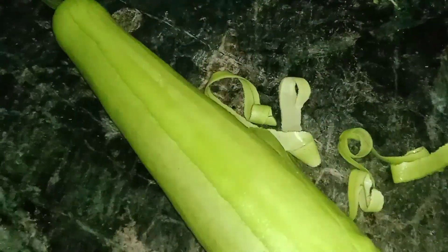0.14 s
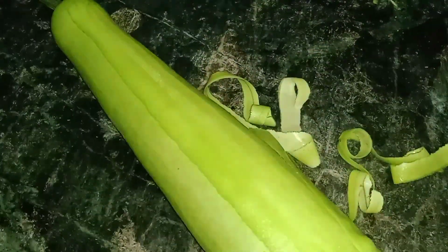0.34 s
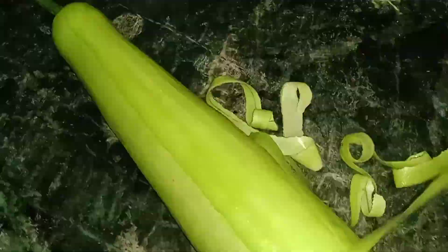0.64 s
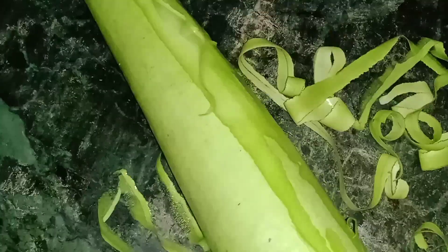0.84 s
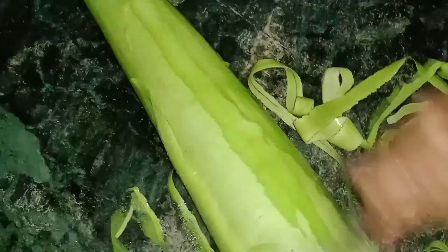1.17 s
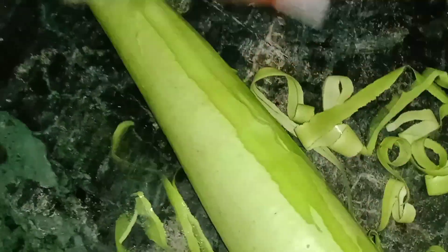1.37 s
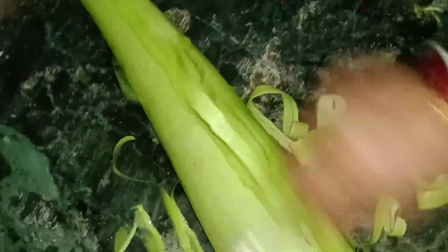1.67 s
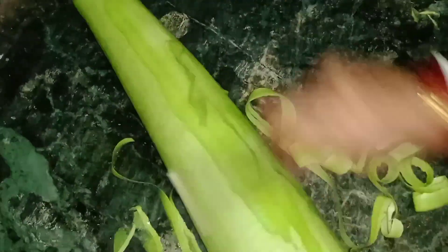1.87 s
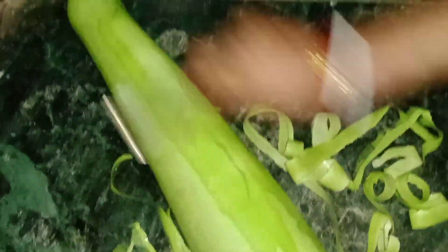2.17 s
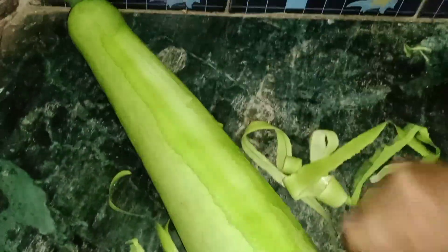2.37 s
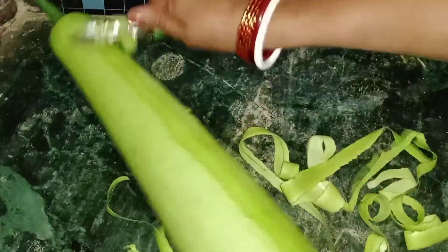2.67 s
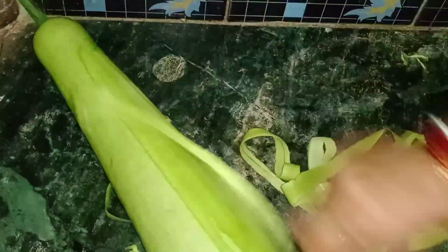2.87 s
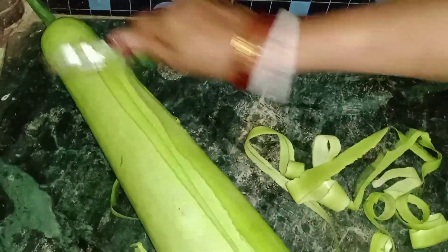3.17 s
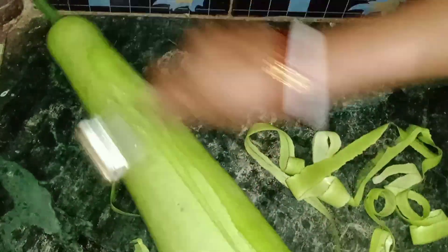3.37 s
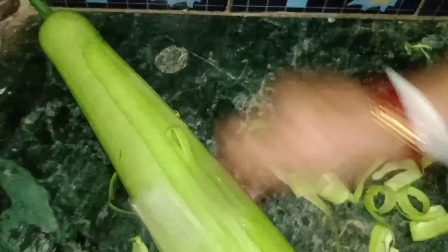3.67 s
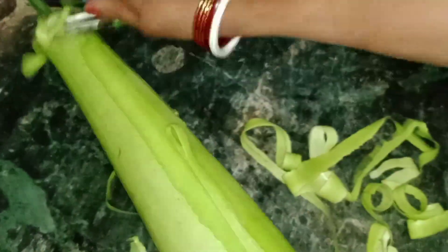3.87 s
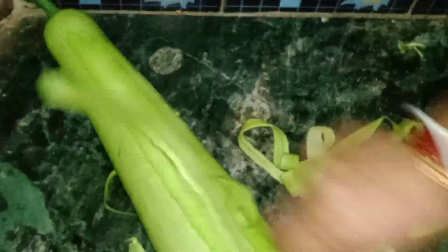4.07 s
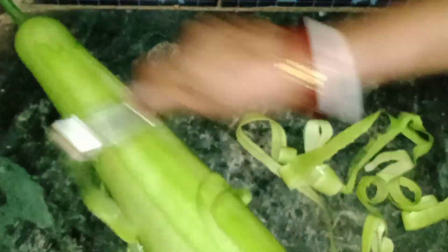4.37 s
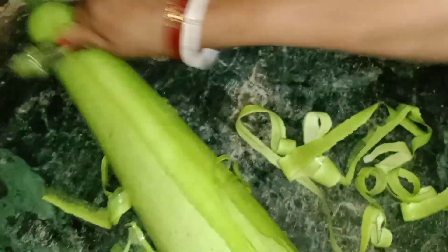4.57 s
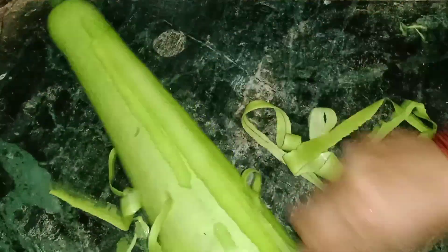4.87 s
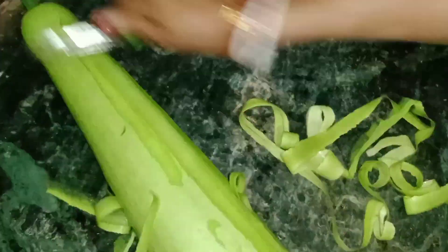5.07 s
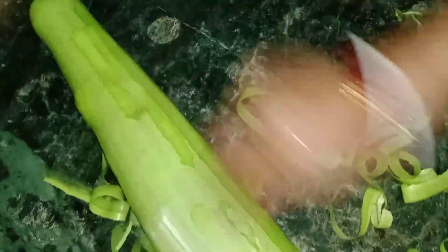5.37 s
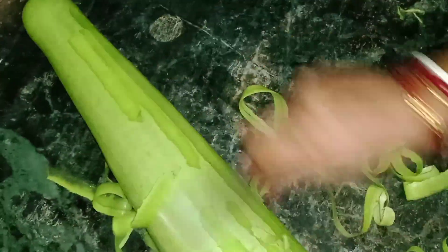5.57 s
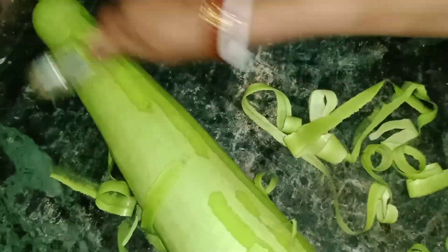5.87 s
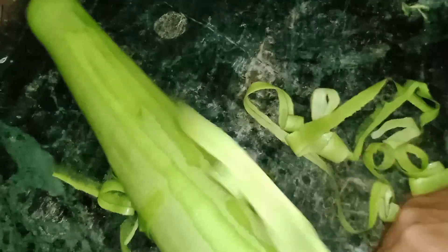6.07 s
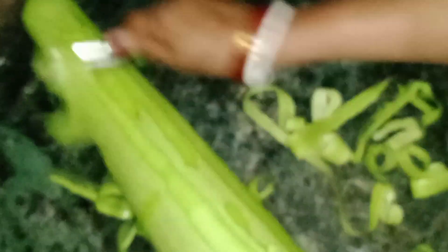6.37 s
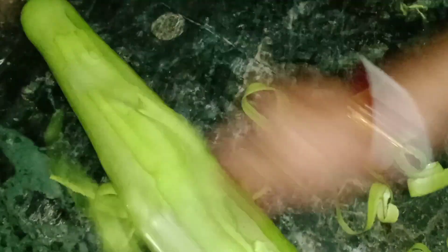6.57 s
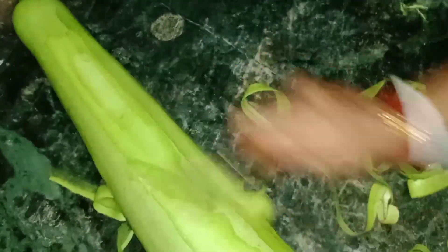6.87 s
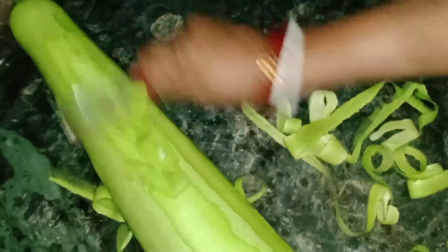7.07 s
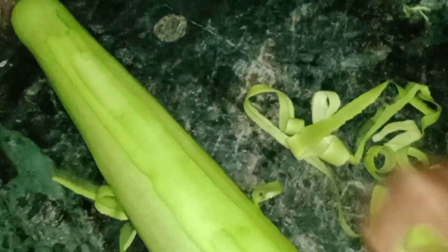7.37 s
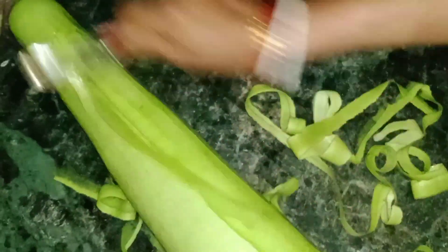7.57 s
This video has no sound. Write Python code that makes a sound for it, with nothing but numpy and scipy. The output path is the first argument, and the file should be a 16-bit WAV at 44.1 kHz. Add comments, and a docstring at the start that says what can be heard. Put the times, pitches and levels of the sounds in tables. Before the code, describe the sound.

Crisp, evenly paced peeling strokes zip along firm vegetable skin, with rattly blade clicks, tiny squeaks and soft knocks, close and dry indoors.

```python
"""A soft hiss dies away over quiet room noise, the gourd bumps on a stone counter and the sound drops out briefly.
Then a swivel peeler takes eleven quick strokes of skin off the bottle gourd.
Around the strokes its loose steel blade clicks and lands: filtered noise that dies away, as steel or firm flesh.
In each stroke random impulses, the bursting plant cells, ring the blade, tear the skin and thud in the flesh.
Squeaks, light brushes and a faint hum come and go; a small kitchen answers, the same in both channels."""
import sys
import numpy as np
from scipy import signal
from scipy.fft import rfft, irfft, next_fast_len
from scipy.io import wavfile
from scipy.ndimage import uniform_filter1d, map_coordinates

SR = 44100
rng = np.random.default_rng(int(sys.argv[2]) if len(sys.argv) > 2 else 0)


def wav_out(sig):
    """Save sig, one row per channel (or a flat mono array), as 16-bit PCM at SR to the path in sys.argv[1]."""
    wavfile.write(sys.argv[1], SR, np.round(np.clip(np.atleast_2d(sig).T, -1, 1) * 32767).astype(np.int16))


N = 340893
TIME = np.arange(N) / SR  # seconds

# Levels of layers and events are starting levels: the mix below adds its own gains.
# Peeling strokes: t/s, time to dig in/s, time at full depth/s, swell while digging in/dB, blade ring/dB,
#   tearing skin/dB, guard rasp/dB, flesh/dB, lower blade resonances/dB, chirping/dB
STROKES = [ (0.96, .12, .08, 14, -37, -50.5, -55.5, -64.5, 0, -6),
           (1.605, 0.15, .03, 11.5, -38.5, -47.5, -54, -63.5, 1.5, -5),
           (2.2, 0.051, 0.12, 6.5, -41.5, -48.5, -60.5, -67.5, -0.5, -4.5),
           (2.8, 0.12, 0.062, 4.5, -47.5, -49.5, -60, -63, 2.5, -8.5),
           (3.393, 0.14, .036, 10, -39, -46, -56.5, -62.5, 0.5, -2.5),
           (4.005, 0.087, 0.081, 10, -33.5, -45, -54, -63.5, 0.5, -17),
           (4.68, 0.12, 0.088, 6.5, -42, -49, -55, -62.5, 2, -5.5),
           (5.322, .165, .045, 3.5, -43, -50.5, -56.5, -61, -2, -19),
           (5.938, 0.17, .035, 14.5, -33, -42.5, -51, -58.5, 0.5, -11.5),
           (6.541, 0.16, 0.058, 1.5, -38.5, -43.5, -54.5, -64.5, 0, -8.5),
           (7.172, 0.1, .05, 13, -40.5, -45.5, -59.5, -62, 1.5, -20)]
# Light brushes of the blade on the way back: t/s, length/s, level/dB
BRUSHES = [(3.085, .04, -64.5), (3.127, .05, -58), (3.2, 0.064, -53.5), (4.39, 0.071, -61.5),
           (6.473, 0.02, -51), (6.925, 0.021, -53)]
# The edge snags on tougher skin and the blade rings harder: t/s, length/s, level/dB
SNAGS = [(1.714, 0.024, -38), (2.92, 0.017, -50), (4.848, 0.033, -45.5), (5.487, 0.033, -42.5)]
# The hand slides over the gourd: t/s, length/s, level/dB
HAND_SLIDES = [(0.757, 0.15, -57.5)]
# The gourd is turned and rubs on the stone: t/s, length/s, level/dB
TURNS = [(2.7, 0.586, -70)]
# The blade clicks in its swivel: t/s, level/dB, top octave/dB, time to fall 60 dB/s
CLICKS = [(0.8585, -35, -28, 0.011), (0.9045, -32.5, -5.5, .028), (1.2567, -48, -28, .015),
          (1.4688, -51, -3, .03), (1.494, -34, -6.5, .075), (2.0993, -44.5, -15, 0.023),
          (2.7228, -34, -7.5, 0.034), (3.315, -33.5, -6.5, 0.041), (3.898, -35.5, -4.5, 0.053),
          (4.4513, -44, -8.5, 0.029), (4.5473, -44, -9, 0.014), (4.5968, -41.5, -4, 0.096),
          (4.5987, -34, -1, 0.018), (4.604, -35, -13, 0.033), (5.0066, -45, -14, 0.033),
          (5.047, -20.5, -13, 0.0067), (5.1876, -34.5, -5.5, 0.041), (5.6328, -36, -10, 0.039),
          (5.7907, -52, -5, 0.029), (5.8661, -32.5, -2, 0.026), (5.877, -28.5, -8, 0.045),
          (6.4164, -56, -4, 0.044), (6.4527, -55, -5, .072), (6.471, -42.5, -15, .037),
          (6.9387, -45.5, -5, 0.021), (6.9453, -43, -1.5, 0.016), (7.0293, -52.5, -6, 0.054),
          (7.663, -57.5, -5, 0.02), (7.6744, -49, -2.5, 0.021)]
# The peeler lands on the gourd: t/s, level/dB
KNOCKS = [(0.56, -68), (0.912, -52.5), (1.552, -48.5), (1.862, -56.5), (2.145, -61), (2.734, -49.5),
          (3.316, -53.5), (3.937, -57.5), (4.614, -49), (5.325, -63), (5.947, -47)]
# The gourd bumps on the counter: t/s, level/dB
BUMPS = [(0.076, -61), (0.562, -55), (2.699, -63), (2.808, -61), (3.221, -66)]
# The blade catches and squeaks: t/s, length/s, f/Hz at the middle, level/dB
SQUEAKS = [(1.116, 0.0076, 6000, -33.5), (1.897, 0.013, 3070, -59.5), (3.11, 0.056, 3085, -63),
           (3.138, .053, 5900, -59), (3.218, .056, 3930, -57), (3.486, 0.006, 6070, -34.5),
           (4.063, 0.014, 6370, -32.5), (4.086, 0.025, 6160, -29.5), (6.559, .01, 5940, -37)]
# A faint hum swells and fades: t/s of the crest, level/dB, rise/(dB/s), fall/(dB/s)
HUM_SWELLS = [(3.34, -80, 300, 45), (3.66, -62.5, 54, 110), (4.12, -73.5, 37, 75)]

# Resonances, each table: f/Hz, width/Hz, level/dB
# The blade while it is pressed on the gourd, main and lower part
LOADED_BLADE = [(5580, 890, -10.5), (5760, 250, -3), (6220, 420, -2.5), (6670, 300, -9.5),
                (7120, 125, -8.5)]
LOADED_BLADE_LOW = [(3176, 105, -10.5), (3500, 520, -9), (3660, 110, -10.5), (3910, 115, 0)]
# The blade swinging free
FREE_BLADE = [(2300, 1600, -24), (3310, 380, -9), (5120, 620, -3), (6040, 580, 0.5), (6710, 235, 6),
              (7500, 240, -2)]
# The peeler's frame, rung by one harder contact
FRAME = [(2330, 81, 4), (2900, 140, 1)]
# The gourd under a knock
KNOCKED_GOURD = [(380, 160, 3.5), (714, 540, -14.5), (1030, 147, 9.5), (4170, 94, 10)]
# The gourd rocking on the stone
ROCKING_GOURD = [(109, 18, 0)]

# Broad spectra, each table: f/Hz, level/dB (per Hz)
# Tearing skin
TEARING_SKIN = [(900, -12), (1300, -12.5), (1750, 4.5), (2250, 8.5), (2600, 2), (3300, 10.5), (4800, 5),
                (7000, 13), (8300, 2), (9500, 5), (11400, 4), (13600, -4.5), (14800, 2.5), (15700, 9.5)]
# Rasp of the guard
GUARD_RASP = [(300, -29), (480, -22), (600, 2.5), (950, 2), (1250, 2), (1700, -8), (3000, -13.5)]
# Thud in the flesh
FLESH_THUD = [(50, -22), (70, -8), (120, -9), (170, -1.5), (230, -2.5), (340, 5.5), (520, 4.5), (750, 1.5),
              (1500, -18)]
# Top octave of a click
CLICK_TOP = [(5000, -51), (7900, -3), (9200, 1), (10600, 0), (12000, -2.5), (14000, -4), (15200, 11.5),
             (15900, -0.5)]
# Hand sliding over the gourd
SLIDING_PALM = [(900, -19), (1600, -10), (2100, 2), (3300, 6.5), (4500, 1), (6300, 6), (8000, -12.5),
                (15000, -20)]
# Gourd rubbing on the stone
STONE_RUB = [(60, -26), (110, -3), (170, -11), (250, 1), (350, -9), (520, -3), (680, -6.5), (900, -12),
             (2000, -14), (5000, -34)]
# Steady room noise
ROOM_AIR = [(18, -54), (30, -21), (144, -0.5), (219, -8.5), (324, -4.5), (443, -10.5), (728, -9.5),
            (921, -6), (1110, -12), (2240, -10), (6720, -14.5), (7650, -19.5), (10700, -27), (13600, -27),
            (15500, -30)]
# Soft hiss at the start
OPENING_HISS = [(150, -16), (450, -8), (900, -1), (1400, -5), (2300, 1), (4000, -9), (6500, -5),
                (9000, -16), (15000, -13)]

# How long the kitchen rings: f/Hz, time to fall 60 dB/s
KITCHEN_DECAY = [(200, 0.52), (1000, 0.61), (3000, 0.33), (6500, 0.36), (10000, 0.29), (15000, 0.28)]
# The brief silence: start/s, end/s
DROPOUT = (0.632, 0.731)

TOP_HZ = 15800  # nothing is heard above this
HUM_HZ = 339  # the hum wavers around this pitch
FRAME_S = 4.597  # when the frame rings
BITE_S, BITE_DB = 0.02, 12  # the edge enters the skin: how long it takes, how far the level climbs
BREAK_S, RUN_OUT_S = 0.028, 0.055  # the strip of peel breaks off, then the blade runs over bare flesh
LIFT_DB_PER_S = 327  # fade as the peeler leaves the gourd
BRUSH_ATTACK_S, BRUSH_FADE_DB_PER_S = 0.0038, 400  # start and end of every light touch
ROOM_DB = -72.5  # room noise, which drifts around this level
OPENING_DB, OPENING_FADE_DB_PER_S = -65.5, 35  # opening hiss
PRESSURE_DB, PRESSURE_RATE = 0.18, 45  # the hand presses unevenly: depth, changes a second


def amp(db):
    """Turn decibels into gain."""
    return 10 ** (np.asarray(db) / 20)


def unit(x):
    """Scale a sound to an rms (average strength) of 1."""
    return x / np.sqrt(np.mean(x ** 2) + 1e-20)


def noise(length=N):
    """White noise: all frequencies equally strong on average."""
    return rng.standard_normal(length)


def along(points, hz):
    """Read a curve of (Hz, value) points on a log frequency axis."""
    f, v = np.transpose(points)
    return np.interp(np.log(hz + 1), np.log(f + 1), v)


def wobble(rate):
    """A smooth random curve with rate random points a second."""
    points = noise(int(N * rate / SR) + 4)
    return map_coordinates(points, [TIME * rate])


def shaped(x, gain):
    """Filter x to a gain against frequency, without any sound ahead of its cause."""
    m = 2 * next_fast_len(len(x) // 2 + 4096)
    log_gain = np.log(np.maximum(gain(np.fft.rfftfreq(m, 1 / SR)), 1e-6))
    # folding the cepstrum forward in time gives the filter its minimum phase
    cepstrum = irfft(log_gain)
    cepstrum[1:m // 2] *= 2
    cepstrum[m // 2 + 1:] = 0
    response = np.exp(rfft(cepstrum))
    return irfft(rfft(x, m) * response)[:len(x)]


def coloured(x, spectrum):
    """Give x a broad spectrum, at rms 1."""
    return unit(shaped(x, lambda hz: amp(along(spectrum, hz))))


def resonated(x, modes):
    """Send x through resonances with steep skirts, at rms 1."""
    def gain(hz):
        return np.sqrt(sum(amp(db) ** 2 / (1 + ((hz - c) / w) ** 2) ** 2 for c, w, db in modes))
    return unit(shaped(x, gain))


def add(track, s, sound):
    """Mix a sound into the track at time s."""
    start = max(round(s * SR), 0)
    track[start:start + len(sound)] += sound[:N - start]


def glide(x, speed):
    """Play x at a changing speed, which carries its resonances up and down."""
    return map_coordinates(x, [np.cumsum(speed)], order=5, mode="wrap")


def patchy(x, depth_db):
    """Favour ever-changing bands, a few hundred Hz wide and a few hundredths of a second long."""
    bands = signal.stft(x, nperseg=512)[2]
    field = uniform_filter1d(rng.standard_normal(bands.shape), size=3, axis=0)
    field = uniform_filter1d(field, size=5, axis=1)
    return unit(signal.istft(bands * amp(depth_db * unit(field)), nperseg=512)[1][:N])


def per_stroke(first, last):
    """A control that runs from first to last within each stroke."""
    times = [(s, s + dig_s + hold_s + BREAK_S + RUN_OUT_S) for s, dig_s, hold_s, *_ in STROKES]
    values = np.zeros((len(times), 2)) + np.transpose([first, last])
    return np.interp(TIME, np.ravel(times), values.ravel())


def stroke_level(column, dig, lean_db, break_db, run_out_db):
    """Gain of one layer over all strokes: the edge bites, digs in, holds, breaks the peel and runs out.
    dig is the layer's share of the swell; lean_db is how much it grows from the start to the end of the cut."""
    gain = np.zeros(N)
    for row in STROKES:
        s, dig_s, hold_s, swell_db = row[:4]
        t, cut_s = TIME - s, dig_s + hold_s
        bite = np.interp(t, [0, BITE_S], [-BITE_DB, 0])
        depth = np.interp(t, [0, dig_s], [-dig * swell_db, 0])
        lean = np.interp(t, [0, cut_s], [-lean_db, 0])
        leaving = np.interp(t - cut_s, [0, BREAK_S, BREAK_S + RUN_OUT_S],
                            [0, -break_db, -break_db - run_out_db])
        lifted = LIFT_DB_PER_S * np.maximum(t - cut_s - BREAK_S - RUN_OUT_S, 0)
        fade_in = np.clip(1 + t / BITE_S, 0, 1)  # just ahead of the bite
        gain += fade_in * amp(row[column] + bite + depth + lean + leaving - lifted)
    return gain


def touch_level(touches, sag_db):
    """Gain of light touches: a quick attack, a sagging hold and a fade."""
    gain = np.zeros(N)
    for s, length, db in touches:
        t = TIME - s
        fade = sag_db * np.clip(t / length, 0, 1) + BRUSH_FADE_DB_PER_S * np.maximum(t - length, 0)
        gain += np.clip(t / BRUSH_ATTACK_S, 0, 1) * amp(db - fade)
    return gain


def background():
    """Steady room noise, a soft hiss that dies away and a faint passing hum."""
    air = amp(ROOM_DB + 1.8 * wobble(2.3)) * coloured(noise(), ROOM_AIR)
    hiss_level = amp(OPENING_DB - OPENING_FADE_DB_PER_S * TIME)
    hiss = hiss_level * coloured(patchy(noise(), depth_db=3.0), OPENING_HISS)
    swell = sum(amp(db - np.maximum(rise * (s - TIME), fall * (TIME - s)))
                for s, db, rise, fall in HUM_SWELLS)
    hum_phase = 2 * np.pi * np.cumsum(HUM_HZ + 1.1 * wobble(8)) / SR
    return air + hiss + swell * unit(np.sin(hum_phase))


def kitchen(x):
    """Tiled walls answer 4 ms later; each frequency dies at its own speed."""
    hz, t, bands = signal.stft(noise(SR // 2), SR, nperseg=256)
    fading = bands * amp(-60 * t / along(KITCHEN_DECAY, hz)[:, None])
    tail = signal.istft(fading, SR, nperseg=256)[1]
    tail = np.pad(tail, (int(.004 * SR), 0))
    return signal.fftconvolve(x, tail / np.linalg.norm(tail))[:N]


def turning_gourd():
    """The turned gourd rubs on the stone: patchy noise with a low, broad spectrum."""
    return touch_level(TURNS, sag_db=1.5) * coloured(patchy(noise(), depth_db=4), STONE_RUB)


def sliding_hand():
    """Skin sliding over the gourd makes a soft, coloured noise."""
    return touch_level(HAND_SLIDES, sag_db=8.5) * coloured(noise(), SLIDING_PALM)


def knocks():
    """The peeler lands on firm flesh, and now and then the gourd rocks on the stone."""
    out, t = np.zeros(N), np.arange(SR // 4) / SR
    for s, db in KNOCKS:
        add(out, s, amp(db - 6.0 - 60 * t / 0.094) * resonated(noise(len(t)), KNOCKED_GOURD))
    for s, db in BUMPS:
        soft_start = 1 - np.exp(-t / 0.0047)
        add(out, s, amp(db - 60 * t / 0.086) * soft_start * resonated(noise(len(t)), ROCKING_GOURD))
    return out


def clicks():
    """The loose blade chatters against its stops, ringing in a new balance each time; the frame rings once."""
    out, t = np.zeros(N), np.arange(SR // 5) / SR
    for s, db, top_db, t60 in CLICKS:
        contacts = noise(len(t)) * amp(3.7 * noise(len(t)))
        fade = amp(-60 * t / t60) * (1 - np.exp(-t / 0.00095))
        balance = [(hz, width, mode_db + rng.normal(0, 3.2)) for hz, width, mode_db in FREE_BLADE]
        steel = amp(-4) * resonated(contacts, balance)
        top = amp(top_db) * coloured(contacts, CLICK_TOP)
        add(out, s - .001, amp(db + 1.0) * fade * (steel + top))
    add(out, FRAME_S, amp(-42 - 60 * t / .06) * resonated(noise(len(t)), FRAME))
    return out


def squeaks(sag=0.047):
    """The edge sticks and slips for a moment: a short tone whose pitch sinks by the share sag."""
    out = np.zeros(N)
    for s, length, hz, db in SQUEAKS:
        u = np.linspace(0, 1, int(length * SR))
        phase = 2 * np.pi * np.cumsum(hz * (1 - sag * (u - .5))) / SR
        add(out, s, amp(db) * np.sin(np.pi * u) * np.sin(phase))
    return out


def ruptures(rate, spread_db, clump_db, clump_rate):
    """Plant cells burst under the edge: tiny impulses of uneven size, in clumps."""
    size = amp(spread_db * np.clip(noise(), -2, 2)) * rng.choice([-1, 1], N)
    bursts = rng.random(N) < rate / SR  # rate is bursts a second
    return unit(size * bursts * amp(clump_db * wobble(clump_rate)))


def rasping_guard():
    """The guard rasps during the cut, its colour climbing in pitch along each stroke."""
    grains = ruptures(rate=2500, spread_db=3, clump_db=2, clump_rate=90)
    rasp = glide(coloured(grains, GUARD_RASP), per_stroke(1.02, 1.37))
    return amp(-5.5) * rasp * stroke_level(column=6, dig=0.43, lean_db=-5.5, break_db=7.5, run_out_db=9)


def thudding_flesh(cells):
    """Bursting cells thud in the flesh, deeper toward the gourd's thick end."""
    thud = glide(coloured(cells, FLESH_THUD), per_stroke(1.35, .9))
    return amp(1.5) * thud * stroke_level(column=7, dig=1.0, lean_db=4.5, break_db=6.5, run_out_db=7)


def off_counter(x, first_s, last_s, strength):
    """The stone reflects the cut; the extra path shortens along each stroke, so a comb of notches sweeps up."""
    delay = per_stroke(first_s, last_s) * (1 + 0.087 * wobble(5))
    echo = map_coordinates(x, [(TIME - delay) * SR], order=5)
    return (x + strength * echo) / np.hypot(1, strength)


def chirps(pitch_hz, wander, burst_db, burst_rate):
    """The blade sticks and slips at a wandering pitch, in bursts a few milliseconds long."""
    tone = np.sin(2 * np.pi * np.cumsum(pitch_hz * (1 + wander * wobble(90))) / SR)
    return unit(tone * amp(burst_db * np.minimum(wobble(burst_rate), 1.5)))


def ringing_blade(cells, modes, drift):
    """The blade's resonances wander as the contact point slides."""
    return glide(resonated(cells, modes), 1 + drift * wobble(22))


def cutting_blade(ring, low_ring):
    """Bursting cells and stick-slip ring the pressed blade, harder where the edge snags."""
    low_gain, chirp_gain = (amp(per_stroke(db, db)) for db in np.transpose(STROKES)[-2:])
    chirp = chirps(pitch_hz=6100, wander=.025, burst_db=8, burst_rate=330)
    blade = amp(-5.0) * ring + amp(-11.5) * low_gain * low_ring + amp(-1) * chirp_gain * chirp
    blade = blade * stroke_level(column=4, dig=0.94, lean_db=.5, break_db=12.5, run_out_db=8.5)
    snagged = amp(-6.5) * ring + amp(-10.5) * low_ring + amp(-2.5) * chirp
    return blade + touch_level(SNAGS, sag_db=5.5) * snagged


def peeling():
    """The same bursting cells tear the skin, ring the blade and thud in the flesh; the blade also brushes lightly."""
    cells = ruptures(rate=6000, spread_db=3, clump_db=1.9, clump_rate=240)
    uneven = patchy(cells, depth_db=2.2)  # uneven skin
    tear = coloured(uneven, TEARING_SKIN)
    ring = ringing_blade(cells, LOADED_BLADE, drift=.012)
    low_ring = ringing_blade(uneven, LOADED_BLADE_LOW, drift=0.00589)
    brush = amp(-6.0) * ring + amp(-11.0) * low_ring + amp(-6.5) * tear
    brush = touch_level(BRUSHES, sag_db=0.0) * brush
    skin = amp(4.0) * tear * stroke_level(column=5, dig=1.0, lean_db=9, break_db=14, run_out_db=9)
    cut = skin + rasping_guard() + thudding_flesh(cells)
    cut = off_counter(cut, first_s=0.001167, last_s=0.000515, strength=0.11)
    pressure = amp(PRESSURE_DB * wobble(PRESSURE_RATE))
    return pressure * (cutting_blade(ring, low_ring) + cut) + brush


def scene():
    """Everything sits in the centre, close by, with a little of the room."""
    cutting = peeling() + sliding_hand() + turning_gourd() + squeaks()
    taps = clicks() + knocks()
    room = kitchen(amp(-9.0) * cutting + amp(-5.5) * taps)
    mono = cutting + taps + room + background()
    return np.array([mono, mono])


def record(dry):
    """Cut a brief silence, and remove everything above the band limit."""
    live = (TIME < DROPOUT[0]) | (TIME > DROPOUT[1])
    m = next_fast_len(N + 8192)
    in_band = np.fft.rfftfreq(m, 1 / SR) < TOP_HZ
    return irfft(rfft(dry * live, m) * in_band, m)[:, :N]


dry = scene()
out = record(dry)
wav_out(out)
```